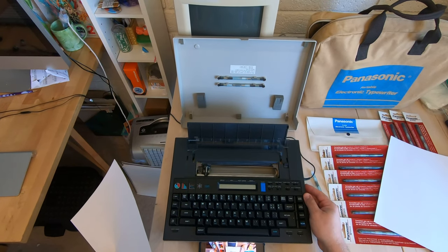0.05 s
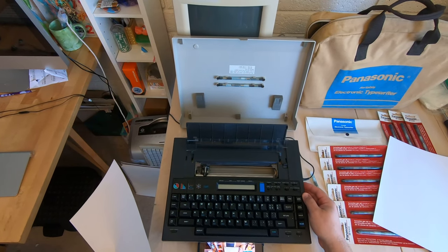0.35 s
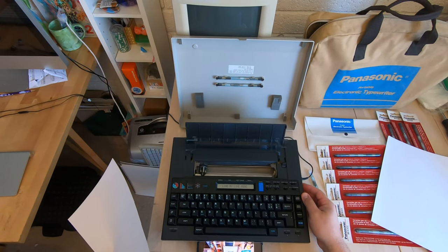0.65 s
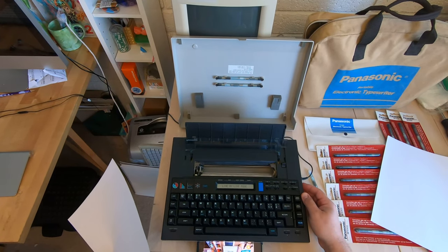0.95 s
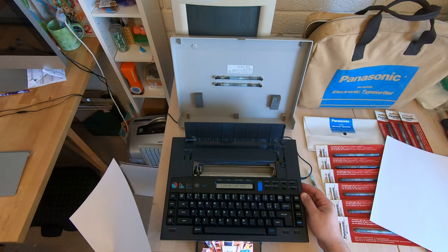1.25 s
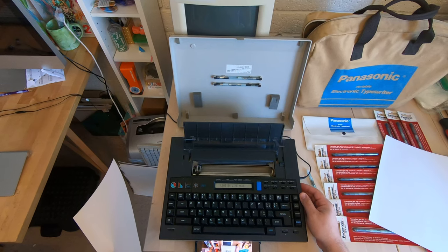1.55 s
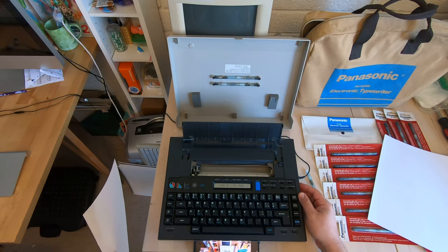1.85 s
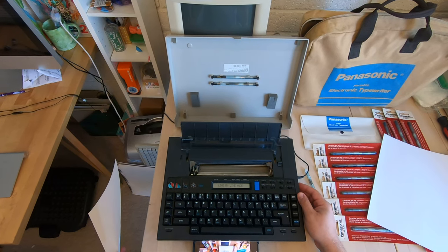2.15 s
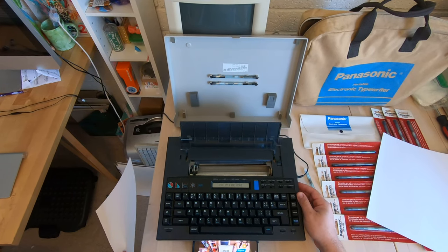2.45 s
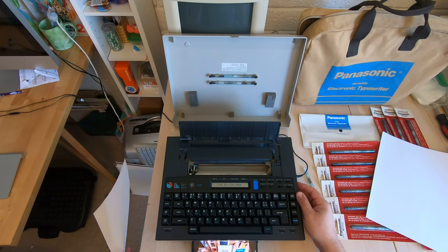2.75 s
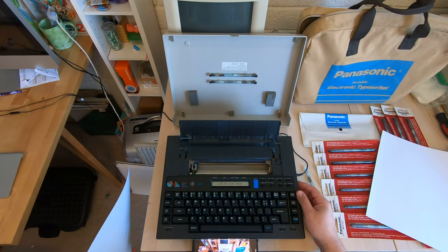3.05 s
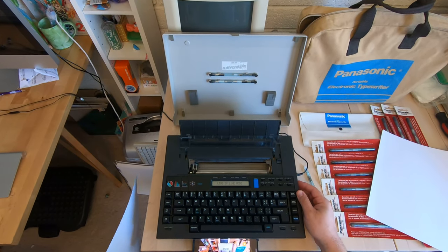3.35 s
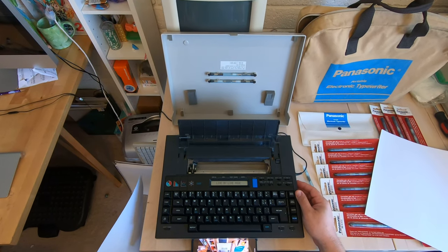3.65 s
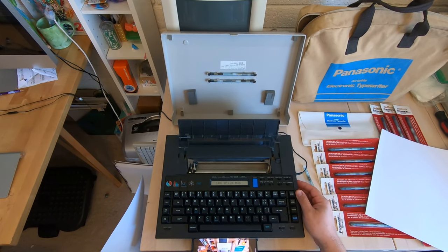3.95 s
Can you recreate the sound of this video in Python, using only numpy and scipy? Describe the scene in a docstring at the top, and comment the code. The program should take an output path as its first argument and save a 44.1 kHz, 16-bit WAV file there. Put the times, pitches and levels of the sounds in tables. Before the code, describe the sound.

Close up on a desk in a quiet room, an electronic typewriter starts with a switch click, a clack, a knock and a short motor hum, then settles into fast, regular mechanical ticking and plastic clacking.

```python
"""An electronic typewriter on a desk in a small, quiet room, heard from close above.
Its switch snaps on, the mechanism engages with a clack and jolts the desk, the carriage knocks
against its stop and the motor hums briefly. Then it runs at about eight cycles a second: the motor
steps, a small steel part ticks, and the carriage clacks and rings the plastic case."""
import sys
import numpy as np
from scipy import signal
from scipy.fft import rfft, irfft, next_fast_len
from scipy.io import wavfile
from scipy.ndimage import uniform_filter1d

SR = 44100
rng = np.random.default_rng(int(sys.argv[2]) if len(sys.argv) > 2 else 0)


def waveform_to_disk(signal):
    """Save audio, clipped to [-1, 1], as 16-bit WAV at the path in sys.argv[1]."""
    frames = np.transpose(np.atleast_2d(signal))
    scaled = np.clip(frames, -1, 1) * 32767
    samples = np.round(scaled).astype(np.int16)
    wavfile.write(sys.argv[1], SR, samples)


N = 4 * SR
FIRST_CYCLE_S, CYCLE_S = 1.014, .1208
SCATTER_DB, JITTER_S = .3, .00003  # how much whole cycles vary in level and timing
LOOSE_DB, LOOSE_S = 1.3, .0006  # how much each hit of a loose part varies

# How the room's rumble and the motor's whirr swell and fade (time [s], level [dB])
RUMBLE_LEVELS = [(0, -77), (.8, -77), (.9, -69), (1.22, -60), (1.35, -72), (2.45, -64), (2.6, -73),
                 (3.6, -91), (3.7, -59), (3.8, -88)]
WHIRR_LEVELS = [(.52, -90), (.55, -49), (.63, -57), (.78, -56.5), (.92, -66), (1.0, -56), (4, -58)]

# Hits that happen only once (time [s], level [dB])
SWITCH_HITS = [(.3318, -25.5), (.338, -32)]
ENGAGE_HITS = [(.522, -66), (.526, -39), (.534, -34), (.541, -37), (.552, -51)]
DESK_HITS = [(.535, -57), (.64, -54), (.738, -50), (.79, -52)]
FIRST_STEP_HITS = [(.6425, -54), (.6735, -39.5), (.679, -46), (.692, -49), (.923, -59), (.9423, -47.5)]
FIRST_TICK_HITS = [(.7079, -43.5), (.719, -48)]
STOP_HITS = [(.7245, -35.5), (.7343, -31.5), (.744, -39.5)]
LOOSE_PANEL_HITS = [(3.0165, -46), (3.023, -57), (3.031, -62), (3.042, -47), (3.058, -57)]

# Hits that come back in every cycle (time into the cycle [s], level [dB])
STEP_HITS = [(0, -50), (.0035, -52), (.007, -55), (.0115, -50.5), (.016, -48.5), (.020, -51.5), (.025, -52)]
TICK_HITS = [(0, -63), (.016, -56.5), (.0335, -49), (.0375, -51), (.0405, -50), (.046, -49), (.0515, -51.5)]
CLACK_HITS = [(.045, -53.5), (.050, -51), (.055, -46), (.0585, -44), (.062, -57.5)]

# Each sound's colour: its balance of low and high (frequency [Hz], relative level [dB])
AIR_COLOUR = [(15, -16), (36, -28), (60, -14.5), (100, -25.5), (140, -9.5), (200, -4.5), (236, -8.5),
              (277, -15), (560, -22.5), (840, -14.5), (1020, -20.5), (7300, -37), (16000, -58)]
RUMBLE_COLOUR = [(15, -24), (28, 14), (36, 14), (50, -6), (90, -27), (300, -87)]
SWITCH_COLOUR = [(120, -48), (200, -34), (473, -47), (529, -24.5), (709, -28), (763, -22.5), (933, -15.5),
                 (1300, -8), (1710, -5.5), (2800, -7.5), (3900, -3.5), (4950, -5.5), (7140, -9.5),
                 (10100, -20.5), (16000, -50)]
ENGAGE_COLOUR = [(70, -44), (120, -13), (200, -13), (290, -5.5), (400, -8), (620, -6), (875, -0.5),
                 (1430, -11), (1830, -1), (6600, -7.5), (10000, -12), (14000, -24), (16000, -70)]
WHIRR_COLOUR = [(50, -45), (100, -13.5), (130, -3), (400, -1), (1000, 1), (1800, -0.5), (3000, -7.5),
                (3800, -9), (5250, -14.5), (8200, -17.5), (15000, -60)]
DESK_COLOUR = [(70, -42), (110, -23), (145, 3), (190, 0.5), (230, -14), (350, -1), (480, -25), (1500, -60)]
STEP_COLOUR = [(71, -39), (120, -11), (370, -10.5), (757, -3.5), (1680, -2.5), (2380, -0.5), (2750, -3),
               (3240, -0.5), (4410, -6), (4780, -10.5), (10800, -20.5), (16000, -49)]
TICK_COLOUR = [(200, -21), (600, -3), (1340, 0), (1700, -4.5), (3300, 0.5), (4300, -5.5), (7200, -7),
               (9900, -8), (11800, -17.5), (14000, -19), (16000, -34)]
STOP_COLOUR = [(71, -62), (120, -10), (402, -28), (773, 1), (988, -8), (1210, -6.5), (1580, -1.5),
               (2200, -3), (2810, -4), (3450, -2), (4980, -23), (8310, -19.5), (13000, -50), (16000, -67)]
CLACK_COLOUR = [(70, -46), (120, -33.5), (300, -10), (520, -8), (800, -7.5), (1000, -4.5), (1600, -4.5),
                (1850, -1.5), (3450, -4), (4000, -6.5), (4600, -14), (9800, -17), (16000, -81)]
GEAR_COLOUR = [(300, -20), (800, 8), (2400, 4.5), (4500, -12), (12000, -44)]

# Pitches at which each part rings; a negative boost is a dip (frequency [Hz], width [Hz], boost [dB])
SWITCH_PEAKS = [(786, 19, 14.6), (1347, 18, 11.3), (1600, 47, 7), (1752, 20, 14), (2040, 30, 10.7),
                (3900, 49, 5.4), (4580, 59, 7.8), (5745, 18, 4)]
CASE_PEAKS = [(295.7, 6.7, 17), (343, 8.7, 14.5), (384.5, 13, 12.5), (464, 85, -24), (520.2, 19.7, 14),
              (551, 6.7, 10), (600, 82, -32), (762, 46, 9), (881, 18, 11.5), (1009, 27, 13.5),
              (1269, 28, 6.5), (1355, 39, 1.5), (1647, 65, -20), (1900, 30, 6.5), (2321, 20, 6.5),
              (2760, 200, -22), (2917, 50, 5.5), (3110, 42, -5), (3994, 18, 10.5)]
STEEL_PEAKS = [(1326, 190, 7.8), (3230, 49, 8.6), (4270, 21, 11.7), (4950, 45, 10.8), (5804, 23, 11.4),
               (6620, 110, 9.8), (8094, 40, 14.4), (9940, 300, 6.7)]
MOTOR_PEAKS = [(123, 19, 6.5), (188, 12.4, 15), (218, 29, -25), (253, 18, 12.5), (312, 14, 13),
               (371, 15, 13), (443, 150, 3.5), (508, 5.6, 8), (555, 11, 9), (583, 97, -0.5)]
STOP_PEAKS = [(512, 14, 20), (755, 54, 4.9), (1214, 31, 16), (1725, 42, 5), (1780, 29, 3.4),
              (2090, 45, 7.7), (2220, 68, 11.4)]

# The tones in the motor's hum (multiple of the step rate, level [dB])
HUM_TONES = [(1, -54), (3, -55.5), (4, -69), (6, -75), (9, -81)]

# Clear tones of a struck part (frequency [Hz], level [dB], time to fade by 60 dB [s])
STEEL_TONES = [(5980, -53, 0.052), (8100, -66, 0.25), (9710, -42.5, 0.021), (10100, -38, 0.0052)]
CARRIAGE_TONES = [(510.7, -48, .17), (554.5, -50, 0.17), (996.4, -37, 0.073), (1377, -49, 0.071),
                  (2335, -42.5, 0.041), (2890, -39.5, .05), (3993, -41.5, 0.059)]

# How wide the sound is (frequency [Hz], gain of the side signal [dB])
STEREO_WIDTH = [(60, -19), (160, 0.5), (300, -12.5), (700, -8), (1400, -6), (2800, -12), (5600, -7),
                (9000, 1), (15000, -3.5)]
# Which way the sound leans (frequency [Hz], left minus right [dB])
STEREO_LEAN = [(60, -3), (200, 1), (700, -2.5), (1300, 0.5), (2400, -.5), (4400, -0.4), (8000, -0.5),
               (11000, -6.5)]


def amp(db):
    """Turn decibels into a gain."""
    return 10 ** (np.asarray(db) / 20)


def along(points, hz):
    """Read a curve of (frequency, value) points on a log frequency axis."""
    freqs, values = np.transpose(points)
    return np.interp(np.log(hz + 1), np.log(freqs + 1), values)


def level(points):
    """A gain for every sample, from (time, level) points."""
    return amp(np.interp(np.arange(N) / SR, *np.transpose(points)))


def filtered(x, response):
    """Scale each frequency in x by response(hz)."""
    size = 2 * next_fast_len(N // 2 + SR // 4)
    hz = np.fft.rfftfreq(size, 1 / SR)
    return irfft(rfft(x, size) * response(hz), size)[..., :N]


def resonate(x, colour, peaks=()):
    """Give x a broad colour with ringing peaks on top; white noise keeps its power."""
    def response(hz):
        lift = 1 + sum((amp(db) ** 2 - 1) / (1 + (2 * (hz - centre) / width) ** 2)
                       for centre, width, db in peaks)
        gain = amp(along(colour, hz)) * np.sqrt(np.abs(lift))
        gain /= np.sqrt(np.mean(gain ** 2))
        # minimum phase: the ringing comes after a hit, never before it
        cepstrum = irfft(np.log(gain + 1e-6))
        cepstrum[1:len(cepstrum) // 2] *= 2
        cepstrum[len(cepstrum) // 2 + 1:] = 0
        return np.exp(rfft(cepstrum))
    return filtered(x, response)


def noise(size=N):
    """White noise in two rows: mid (shared by both ears) and side (what sets them apart)."""
    return rng.standard_normal((2, size))


def bursts(hits, fade_s, room_db, room_fade_s, size=N):
    """A burst of noise per hit: it falls 60 dB in fade_s, and its room echo in room_fade_s."""
    energy = np.zeros(size)
    for time, db in hits:
        energy[max(round(time * SR), 0)] += amp(db) ** 2
    rates = np.log(1e6) / np.array([fade_s, room_fade_s])
    power = sum(share * rate * signal.lfilter([1], [1, -np.exp(-rate / SR)], energy + 1e-20)
                for share, rate in zip((1, amp(room_db) ** 2), rates))
    return noise(size) * np.sqrt(.01 * power)  # a hit's level is its energy spread over 10 ms


def flatten(x, bins):
    """Even out a burst's spectrum, so that all its pitches are about equally strong."""
    spectrum = rfft(x, 2 * x.shape[1])
    power = np.abs(uniform_filter1d(np.abs(spectrum) ** 2, bins))
    return irfft(spectrum * np.sqrt(power.mean() / (power + 1e-20)))[:, :x.shape[1]]


def strike_once(hits, fade_s, room_db, room_fade_s):
    """Play a group of hits one time."""
    start = round(hits[0][0] * SR)
    burst = bursts(hits, fade_s, room_db, room_fade_s)[:, start:start + 3 * SR // 4]
    return np.pad(flatten(burst, bins=90), ((0, 0), (start, N - start - burst.shape[1])))


def strike_each_cycle(hits, fade_s, room_db, room_fade_s, loose_share):
    """Repeat a group of hits: a firm part rings alike every time, a loose part rattles anew."""
    size, out = SR // 3, np.zeros((2, N + SR))
    firm = flatten(bursts(hits, fade_s, room_db, room_fade_s, size), bins=35)
    firm[:, :round(hits[0][0] * SR)] = 0  # silent before the first hit
    for time in np.arange(FIRST_CYCLE_S, N / SR, CYCLE_S):
        start = round((time + JITTER_S * rng.normal()) * SR)
        force = amp(SCATTER_DB * rng.normal())
        shaken = hits + rng.standard_normal((len(hits), 2)) * [LOOSE_S, LOOSE_DB]
        loose = bursts(shaken, fade_s, room_db, room_fade_s, size)
        blend = np.sqrt(1 - loose_share) * firm + np.sqrt(loose_share) * loose
        out[:, start:start + size] += force * blend
    return out[:, :N]


def ring_each_cycle(tones, delay_s, rise_s, scatter_db):
    """Clear, fading tones struck once a cycle, reaching left and right out of step."""
    t, out = np.arange(SR // 4) / SR, np.zeros((2, N + SR))
    for time in np.arange(FIRST_CYCLE_S, N / SR, CYCLE_S):
        start = round((time + delay_s + JITTER_S * rng.normal()) * SR)
        force_db = scatter_db * rng.normal()
        for hz, db, fade_s in tones:
            phase = 2 * np.pi * hz * t
            gain = amp(db + force_db + rng.normal())
            shape = np.exp(-np.log(1000) * t / fade_s) * (1 - np.exp(-t / rise_s))
            out[:, start:start + len(t)] += gain * shape * np.array([np.sin(phase), np.cos(phase)])
    return out[:, :N]


def room():
    """Faint room air and a low rumble that comes and goes."""
    air = amp(-65.5) * resonate(noise(), AIR_COLOUR)
    return air + level(RUMBLE_LEVELS) * resonate(noise(), RUMBLE_COLOUR)


def switch_snap():
    """The plastic switch flips over with one sharp snap."""
    snap = strike_once(SWITCH_HITS, fade_s=.066, room_db=-8.5, room_fade_s=.29)
    return resonate(snap, SWITCH_COLOUR, SWITCH_PEAKS)


def engage_clack():
    """The mechanism engages, ringing both the case and the steel part."""
    clack = strike_once(ENGAGE_HITS, fade_s=.056, room_db=-11, room_fade_s=.32)
    softer_peaks = [(hz, width, .94 * db) for hz, width, db in CASE_PEAKS + STEEL_PEAKS]
    return resonate(clack, ENGAGE_COLOUR, softer_peaks)


def motor():
    """The motor whirrs while it has power, and each of its steps jerks the case."""
    steps = strike_each_cycle(STEP_HITS, fade_s=.04, room_db=-4.5, room_fade_s=.29, loose_share=.52)
    steps += strike_once(FIRST_STEP_HITS, fade_s=.12, room_db=-1.5, room_fade_s=.16)
    whirr = level(WHIRR_LEVELS) * resonate(noise(), WHIRR_COLOUR, MOTOR_PEAKS)
    return resonate(steps, STEP_COLOUR, CASE_PEAKS) + whirr


def desk_thuds():
    """The desk top answers the jolts of starting with low thuds."""
    jolts = strike_once(DESK_HITS, fade_s=.12, room_db=-10, room_fade_s=.38)
    return resonate(jolts, DESK_COLOUR)


def steel_ticks():
    """A small steel part ticks brightly like a ratchet and pings once a cycle."""
    ticks = strike_each_cycle(TICK_HITS, fade_s=.026, room_db=-5.5, room_fade_s=.24, loose_share=.4)
    ticks += strike_once(FIRST_TICK_HITS, fade_s=.055, room_db=-8, room_fade_s=.27)
    ping = ring_each_cycle(STEEL_TONES, delay_s=.038, rise_s=.00017, scatter_db=0)
    return resonate(ticks, TICK_COLOUR, STEEL_PEAKS) + ping


def stop_knock():
    """The carriage hits its stop: three quick hits heard as one knock."""
    knock = strike_once(STOP_HITS, fade_s=.053, room_db=-16.5, room_fade_s=.37)
    return resonate(knock, STOP_COLOUR, STOP_PEAKS)


def motor_hum():
    """The motor briefly steps so fast and evenly that it makes a note, with gear noise on top."""
    start_s, end_s, ramp_s, step_hz = .752, .97, .025, 326.4
    t = np.arange(N) / SR
    running = np.clip(np.minimum(t - start_s, end_s - t) / ramp_s, 0, 1)
    note = sum(amp(db) * np.sqrt(2) * np.sin(2 * np.pi * multiple * step_hz * t)
               for multiple, db in HUM_TONES)
    gears = amp(-56) * resonate(noise(), GEAR_COLOUR)
    return running * (np.outer([1, 0], note) + gears)  # the note is in the mid row only


def carriage_clacks():
    """Each cycle the carriage halts with a pitched knock and shakes the case; a loose panel buzzes once."""
    shakes = strike_each_cycle(CLACK_HITS, fade_s=.04, room_db=-13, room_fade_s=.22, loose_share=.15)
    buzz = strike_once(LOOSE_PANEL_HITS, fade_s=.057, room_db=-12, room_fade_s=.2)
    knock = ring_each_cycle(CARRIAGE_TONES, delay_s=.051, rise_s=.0037, scatter_db=SCATTER_DB)
    return resonate(shakes + buzz, CLACK_COLOUR, CASE_PEAKS) + knock


def scene():
    """Mix it all near the centre; the highest sounds are wider and lean to the right."""
    start_up = switch_snap() + engage_clack() + stop_knock()
    machine = motor() + motor_hum() + steel_ticks() + carriage_clacks()
    mid, side = start_up + machine + desk_thuds() + room()
    side = filtered(side, lambda hz: amp(along(STEREO_WIDTH, hz)))
    left_right = np.array([mid + side, mid - side])
    return filtered(left_right, lambda hz: amp(np.outer([.5, -.5], along(STEREO_LEAN, hz))))


def record(dry):
    """Cut everything above 16 kHz."""
    return filtered(dry, lambda hz: hz < 16000)


dry = scene()
out = record(dry)
waveform_to_disk(out)
```